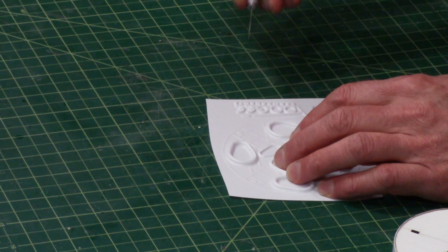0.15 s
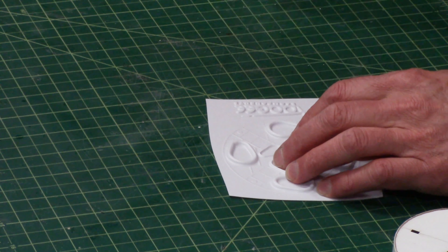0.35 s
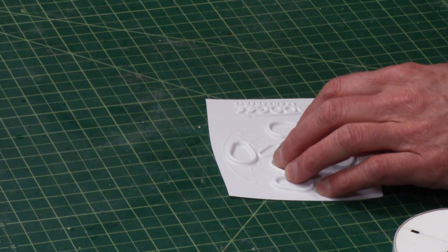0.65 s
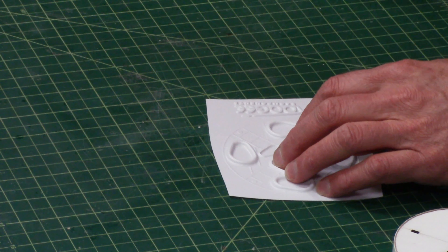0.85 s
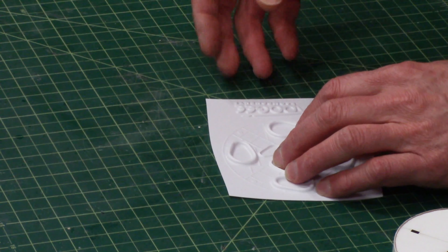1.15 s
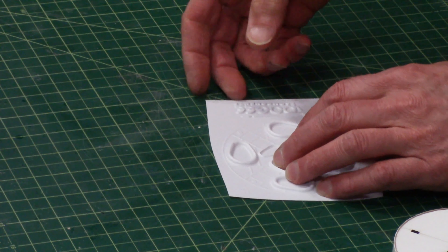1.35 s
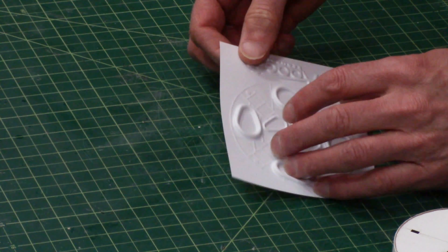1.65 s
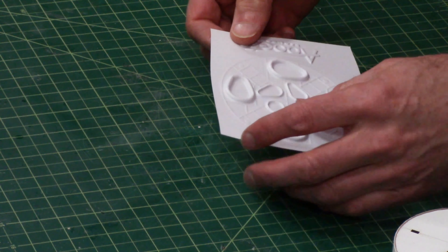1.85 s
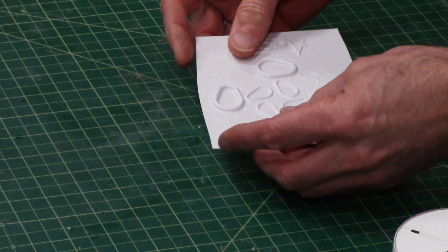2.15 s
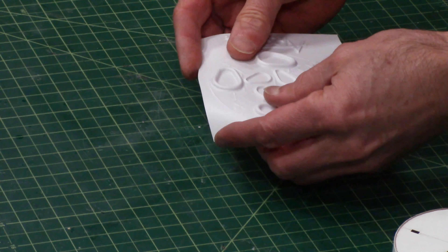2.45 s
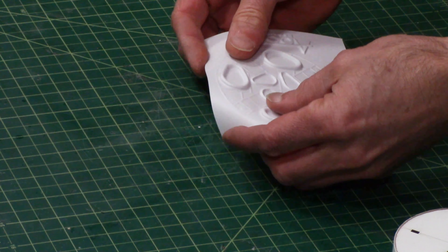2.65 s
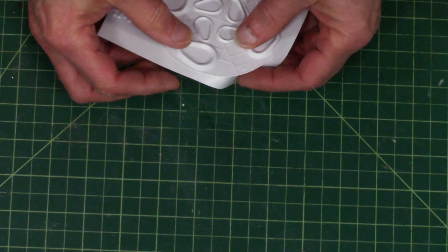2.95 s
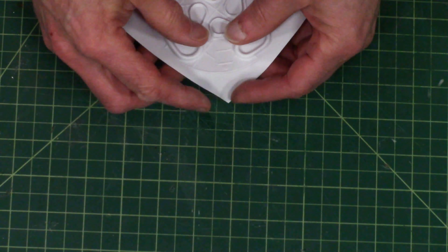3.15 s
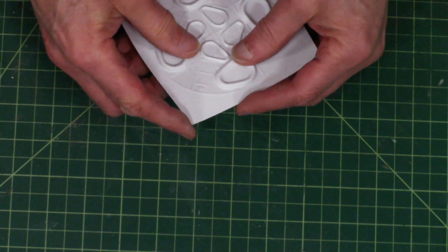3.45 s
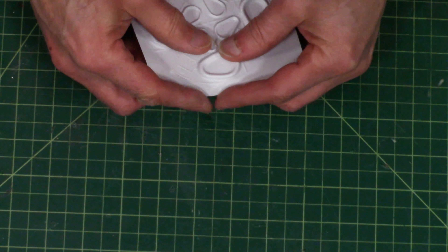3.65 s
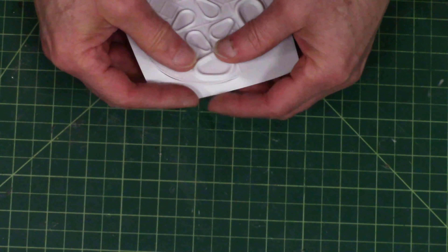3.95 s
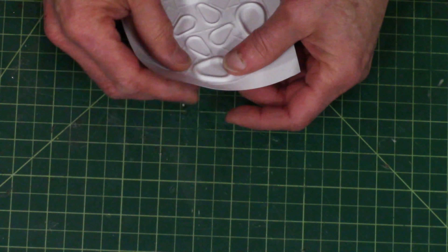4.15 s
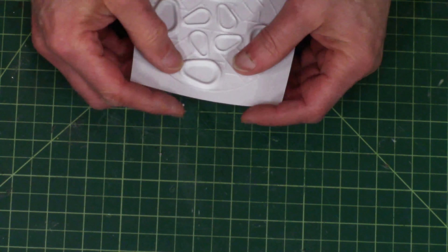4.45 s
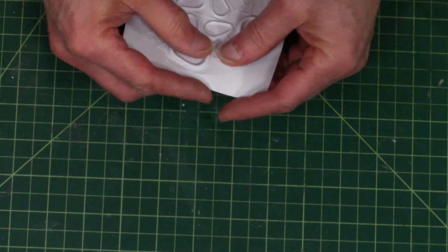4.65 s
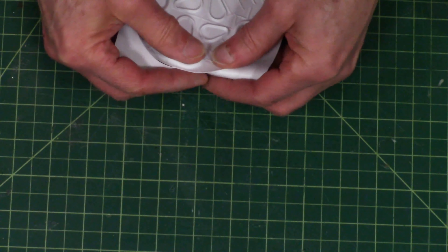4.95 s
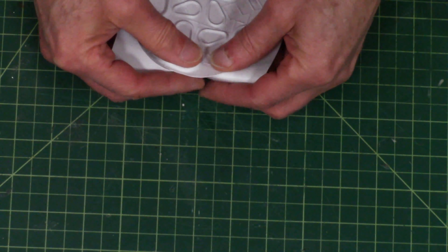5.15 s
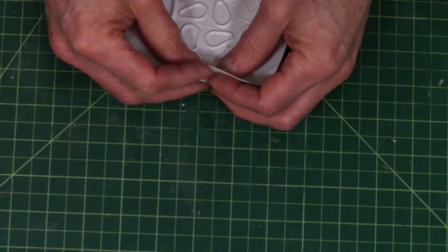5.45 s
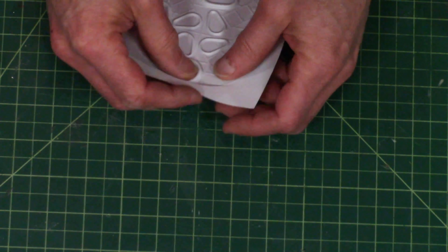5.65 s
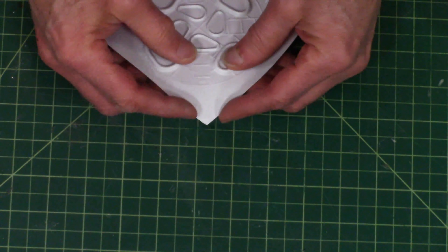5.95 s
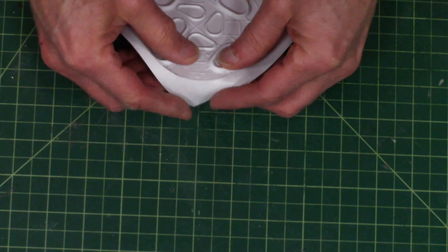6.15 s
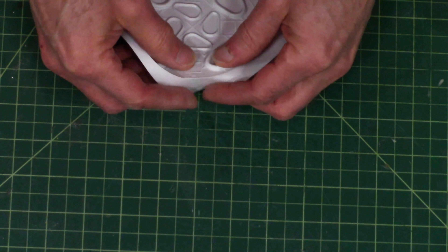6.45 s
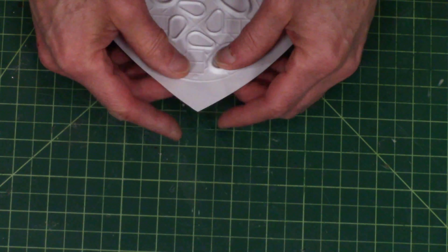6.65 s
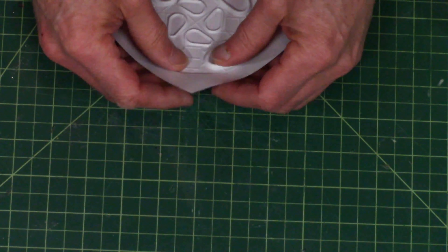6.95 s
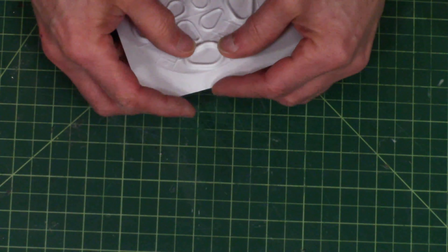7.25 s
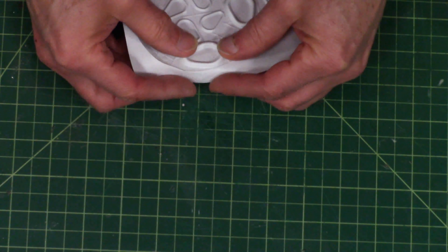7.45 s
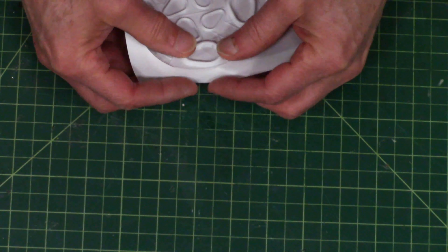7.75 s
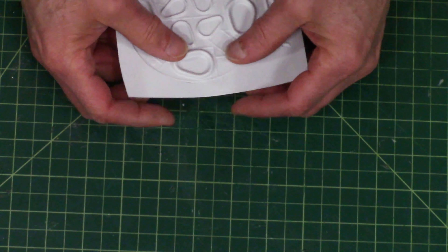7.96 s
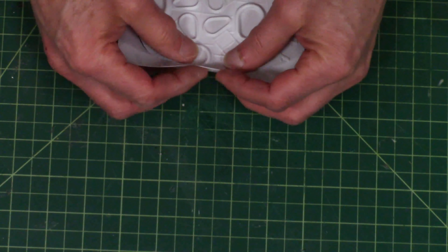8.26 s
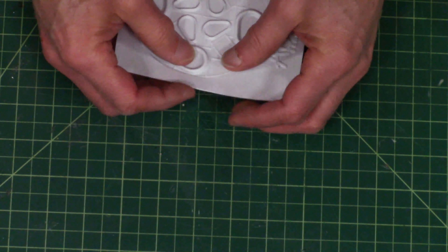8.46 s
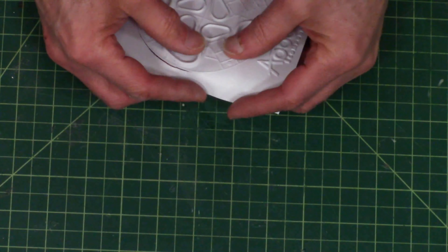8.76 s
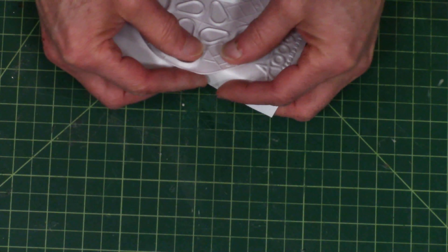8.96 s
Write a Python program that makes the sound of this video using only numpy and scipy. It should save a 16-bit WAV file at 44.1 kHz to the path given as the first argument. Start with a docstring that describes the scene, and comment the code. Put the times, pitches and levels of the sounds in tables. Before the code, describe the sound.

A craft knife is set down with a woody clack and a few fading taps on a matted bench. Hands pick up a thin plastic sheet with light scuffs, then bend it to and fro. Dry rustling strokes and tiny ticks run between crackles, with loud brittle snaps early on and again later. Close stereo microphones, small dry room, faint hiss and low rumble.

```python
"""Scored plastic sheet flexed by hand

A craft knife is laid on a cutting mat; two hands lift a thin scored plastic sheet and flex it to and fro.
The score crackles and snaps: each crack is a grainy burst of force that rings the plastic and the sheet.
Fingertips slide over the plastic as shaped noise and tiny ticks; knocks ring the modes of a bench.
A small, dry workshop answers with a few hard reflections, over a low rumble and faint hiss."""
import sys
import numpy as np
from scipy import signal
from scipy.fft import rfft, irfft
from scipy.io import wavfile
from scipy.ndimage import uniform_filter1d

SR = 44100
rng = np.random.default_rng(int(sys.argv[2]) if len(sys.argv) > 2 else 0)


def output_pcm(signal):
    """Save a mono or channel-first signal as 16-bit PCM at the path in sys.argv[1].

    Samples are clipped to [-1, 1] before scaling.
    """
    pcm = np.clip(np.atleast_2d(signal).T, -1, 1) * 32767
    wavfile.write(sys.argv[1], SR, np.round(pcm).astype(np.int16))


N = 401310
TAPS = 4096
HZ = np.fft.rfftfreq(TAPS, 1 / SR)


def amp(db):
    """Decibels to gain."""
    return 10 ** (np.asarray(db) / 20)


def evened(x):
    """Scales to rms 1."""
    return x / np.sqrt(np.mean(x ** 2) + 1e-20)


def read(points, hz):
    """Joins (Hz, value) points on a log-frequency axis."""
    f, value = np.transpose(points)
    return np.interp(np.log(hz + 1), np.log(f + 1), value)


def add(mix, start_s, sound):
    """Mixes a sound in at a time, cut at the end of the mix."""
    part = mix[:, round(start_s * SR):][:, :sound.shape[-1]]
    part += sound[..., :part.shape[1]]


def coloured(x, spectrum):
    """Gives a long signal a spectrum, at rms 1."""
    gain = amp(read(spectrum, np.fft.rfftfreq(N, 1 / SR)))
    return evened(irfft(rfft(x) * gain, N))


def causal(db):
    """Minimum-phase impulse response: the sharpest start this spectrum allows."""
    log_gain = np.log(amp(np.r_[db, db[-2:0:-1]]))
    return np.fft.ifft(np.exp(np.conj(signal.hilbert(log_gain)))).real


def ring(modes):
    """Impulse response of a few damped modes, alternating in sign."""
    t = np.arange(TAPS) / SR
    response = 0
    for k, (hz, width_hz, db) in enumerate(modes):
        decay = np.exp(-np.pi * width_hz * t)
        response = response + (-1) ** k * amp(db) * width_hz * decay * np.sin(2 * np.pi * hz * t)
    return response


def burst(ms, quick=1.61, grit_db=2.5):
    """Tiny fractures or slips that build up to a peak at ms / quick, then die; flattened in spectrum."""
    u = quick * np.arange(TAPS) / SR / (max(ms, .05) / 1000)
    grains = rng.standard_normal(TAPS) * amp(grit_db * np.minimum(rng.exponential(1, TAPS), 3))
    force = grains * u * np.exp(-u)
    power = uniform_filter1d(abs(rfft(force)) ** 2, size=30)
    flatten = causal(-10 * np.log10(power + power.mean() / 20))
    return signal.fftconvolve(force, flatten)[:TAPS]


def strike(force, body, db):
    """A force rings a body; db is its energy as an rms level over 20 ms."""
    sound = signal.fftconvolve(force, body)
    return amp(db) * np.sqrt(SR / 50) * sound / np.linalg.norm(sound)


def diffuse(size, apart_hz):
    """Noise from all around at two close microphones: alike in the bass, unrelated in the treble."""
    mid, side = rng.standard_normal((2, size))
    side = signal.lfilter(*signal.butter(1, apart_hz, "high", fs=SR), side)
    return np.array([mid + side, mid - side]) / np.sqrt(2)


# Rumble spectrum. Each row: frequency in Hz, relative density in dB per Hz.
RUMBLE_SPECTRUM = [(15, -5), (38, 0.5), (51, -9.5), (70, 0), (110, -4.5), (160, -12.5), (260, -19),
                   (450, -19), (800, -30.5), (2000, -34), (8000, -82)]
# Hiss spectrum. Each row: frequency in Hz, relative density in dB per Hz.
HISS_SPECTRUM = [(100, 8), (1000, -11), (1500, -2), (1780, -1), (1970, 7), (2250, -6.5), (3200, -5.5),
                 (6300, 0), (9000, -4), (12000, -7.5), (16000, -12.5)]


def background(rumble_db=-59.5, hiss_db=-65.0, growth_db=1.5):
    """Low rumble of the building, slowly growing, and microphone hiss."""
    growth = amp(rumble_db + growth_db * np.linspace(-.5, .5, N))
    rumble = coloured(diffuse(N, apart_hz=297.0), RUMBLE_SPECTRUM) * growth
    hiss = coloured(rng.standard_normal((2, N)), HISS_SPECTRUM) * amp(hiss_db)
    return rumble + hiss


# Reflections off the bench, wall and gear.
# Each row: delay left in ms, delay right in ms, left level in dB, right level in dB (re direct sound).
REFLECTIONS = [(.55, 0.37, -4.5, -4.5), (1.7, 1.9, -9, -9), (5.1, 4.7, -7, -6.5), (5.6, 5.7, 1.5, 1),
               (9.0, 6.4, -6, -14.5), (13.6, 11, -19.5, -14), (19.0, 8.3, -21, -25)]
# Decay of the workshop. Each row: frequency in Hz, t60 in seconds.
ROOM_T60 = [(150, 0.58), (500, 0.3), (1700, 0.23), (5500, 0.19), (9000, 0.15), (15000, 0.085)]
# Left minus right. Each row: frequency in Hz, level difference in dB.
LEFT_RIGHT_DB = [(400, -0.5), (1000, 0.5), (1400, -5), (2400, -3.5), (4200, -0.5), (6000, -6.5), (7500, 1),
                 (9500, 3.5), (15000, 7.5)]


def workshop(x, tail_db=0., build_s=0.0061, scatter_ms=0.15):
    """Direct sound, early reflections scattered by uneven surfaces, then a short diffuse tail."""
    size = SR // 2
    early = np.zeros((2, size))
    early[:, 0] = 1
    smooth = signal.butter(1, 1200, fs=SR)
    for left_ms, right_ms, left_db, right_db in REFLECTIONS:
        for side, (ms, db) in enumerate([(left_ms, left_db), (right_ms, right_db)]):
            # long waves bounce cleanly, short ones are scattered
            scatter = burst(scatter_ms)
            echo = scatter + signal.lfilter(*smooth, signal.unit_impulse(TAPS) - scatter)
            add(early[side:side + 1], ms / 1000, amp(db) * echo)
    hz, t, z = signal.stft(diffuse(size, 1900), SR, nperseg=256)
    decay = np.exp(-np.log(1000) * t / read(ROOM_T60, hz)[:, None])
    tail = signal.istft(z * decay, SR, nperseg=256)[1][:, :size]
    tail *= 1 - np.exp(-np.arange(size) / SR / build_s)
    response = early + amp(tail_db) * tail / np.linalg.norm(tail[0])
    response /= np.sqrt((response ** 2).sum() / 2)
    sides = np.array([causal(sign * read(LEFT_RIGHT_DB, HZ)) for sign in (.5, -.5)])
    response = signal.fftconvolve(response, sides, axes=1)
    return signal.fftconvolve(x, response, axes=1)[:, :N]


def moving(x, count=3, stay_s=.7):
    """The hands shift about: the sound takes turns through a few variants of the room response."""
    place = np.floor(np.arange(N) / SR / stay_s) % count
    return sum(workshop(x * uniform_filter1d(1. * (place == k), size=400)) for k in range(count))


# Knife and hands touching the bench.
# Each row: start in seconds, thud level in dB, clack level in dB, burst length in ms.
BENCH_KNOCKS = [(0.6143, -38, -33.5, 1.66), (.747, -44, -51, 1.25), (.761, -45.5, -56.5, 2.6),
                (.829, -51, -60, 1.17), (1.008, -51, -68, 2.2), (1.23, -51, -67, 1.4),
                (1.29, -51.5, -70, 81), (1.383, -45, -55, 2.5), (1.412, -49, -62, 15),
                (1.48, -63, -73, 5.3), (4.015, -53.5, -53, 6.9), (4.075, -58.5, -65, 16)]
# Modes of the bench top under the mat. Each row: frequency in Hz, width in Hz, relative level in dB.
BENCH_MODES = [(189.4, 68, -4.5), (262, 59, -1.5), (388, 36, 2), (460, 190, -8), (697, 320, -9.5),
               (970, 730, -19.5)]
# Clack spectrum. Each row: frequency in Hz, relative density in dB per Hz.
CLACK_SPECTRUM = [(150, -24), (500, -12), (850, -8.5), (1400, -9.5), (2000, -6.5), (2600, -10.5),
                  (3500, -17), (8000, -25), (16000, -48)]
# Tick spectrum. Each row: frequency in Hz, relative density in dB per Hz.
TICK_SPECTRUM = [(800, -18), (3000, -6), (3700, -6), (4400, 0), (6300, 1), (8500, 0), (10200, -2),
                 (11500, -12), (13500, -22), (16000, -36)]


def knocks(tick_re_clack_db=-5):
    """A blow thuds in the bench modes; the harder the contact, the more it clacks and ticks."""
    out, bench = np.zeros((2, N)), ring(BENCH_MODES)
    clack, tick = causal(read(CLACK_SPECTRUM, HZ)), causal(read(TICK_SPECTRUM, HZ))
    for start_s, thud_db, clack_db, ms in BENCH_KNOCKS:
        force = burst(ms)
        sound = strike(force, bench, thud_db)
        sound += strike(force, clack, clack_db)
        sound += strike(force, tick, clack_db + tick_re_clack_db)
        add(out, start_s, sound)
    return out


# Strokes of the fingertips over the sheet.
# Each row: middle in seconds, length in seconds, level in dB before layer trim, brightness in dB.
FINGER_STROKES = [(1.608, 0.082, -53.5, -1), (1.72, 0.099, -52, 1), (2.017, .24, -54.5, 4),
                  (2.21, 0.21, -55, 4), (2.386, 0.071, -56.5, 3), (2.488, 0.16, -59, -4),
                  (2.641, .22, -53.5, -9), (2.98, 0.17, -57.5, -1), (3.145, 0.062, -53, -2),
                  (3.276, 0.24, -52, 0), (3.469, 0.12, -50.5, 1.5), (3.72, 0.37, -54.5, -3),
                  (3.91, 0.16, -58.5, 3), (4.071, 0.22, -51, -1), (4.282, 0.068, -50.5, 1),
                  (4.417, 0.22, -59.5, 3), (4.577, 0.14, -53, 1), (4.68, 0.082, -55.5, 4.5),
                  (4.882, .12, -61.5, -7), (4.993, 0.13, -58.5, -8), (5.333, 0.23, -55, -2),
                  (5.635, 0.047, -56, 2), (5.727, 0.13, -55.5, 5), (5.915, 0.22, -56, 2),
                  (6.17, 0.081, -51, 1), (6.528, 0.13, -57.5, -1), (6.762, 0.31, -54.5, -1),
                  (7.1, 0.23, -55, 5.5), (7.285, 0.25, -56, 0), (7.69, 0.22, -55, -5),
                  (7.944, .15, -52, -2), (8.184, 0.095, -60, 1), (8.546, .13, -57, 2.5),
                  (8.742, 0.19, -54, 1.5), (8.938, 0.31, -48.5, -4)]


def sliding(lift_s=1.38, grip_db=-67.5, skew=0.9, curve=0.92):
    """Gain that follows fingertip speed: one arch per stroke, over the creep of the grip once lifted."""
    t = np.arange(N) / SR
    power = amp(grip_db) ** 2 * (t > lift_s)
    for middle_s, length_s, db, _ in FINGER_STROKES:
        progress = np.clip((t - middle_s) / length_s + .5, 0, 1)
        # skew under 1: the finger breaks loose faster than it comes to rest
        speed = abs(np.sin(np.pi * progress ** skew))
        power = power + (amp(db) * speed ** curve) ** 2
    return np.sqrt(power)


def brightness(hz, t, bright_hz=7800):
    """Treble gain in dB over frequency and time, gliding from one stroke's middle to the next."""
    middle_s, _, _, bright_db = np.transpose(FINGER_STROKES)
    treble = 1 / (1 + (bright_hz / (hz + 1)) ** 8)
    return np.outer(treble, np.interp(t, middle_s, bright_db))


# Spectrum of skin on plastic. Each row: frequency in Hz, relative density in dB per Hz.
SLIDE_SPECTRUM = [(100, -16), (450, -7.5), (800, -14.5), (1100, -14.5), (1400, -1), (1900, -2.5),
                  (2500, -9.5), (3400, -8), (4400, -3.5), (6300, 3), (8600, 1), (11000, -7.5),
                  (13000, -18.5), (16000, -26)]


def crackle(level_db=-2.5, ticks_per_s=300, spread_db=3.4):
    """Skin catches and slips on the embossed plastic in a stream of tiny ticks."""
    size = amp(spread_db * np.minimum(rng.exponential(1, N), 3))
    ticks = (rng.random(N) < ticks_per_s / SR) * rng.choice([-1, 1], N) * size
    return coloured(ticks, SLIDE_SPECTRUM) * sliding() * amp(level_db) * np.ones((2, 1))


def rustle(level_db=-1.0, patch_db=2.2, jerk_db=1.2):
    """Friction hiss, its colour wandering in patches as the sheet bends and the fingers move."""
    hz, t, z = signal.stft(diffuse(N, apart_hz=3500.), SR, nperseg=512)
    patches = uniform_filter1d(rng.standard_normal(z.shape[1:]), size=9, axis=0)
    patches = evened(uniform_filter1d(patches, size=14, axis=1))
    jerks = evened(uniform_filter1d(rng.standard_normal(len(t)), size=4))
    wander_db = patch_db * patches + jerk_db * jerks
    sides_db = np.array([[.5], [-.5]]) * read(LEFT_RIGHT_DB, hz)
    colour_db = (read(SLIDE_SPECTRUM, hz) + sides_db)[:, :, None] + wander_db + brightness(hz, t)
    hiss = signal.istft(z * amp(colour_db), SR, nperseg=512)[1][:, :N]
    return evened(hiss) * sliding() * amp(level_db)


def radiated(x, corner_hz):
    """Air slips round the edge of a small sheet, so it hardly radiates below its modes."""
    return signal.lfilter(*signal.butter(3, corner_hz, "high", fs=SR), x)


# Cracks and scuffs of the sheet. Each row: time in seconds, crack level in dB, flex ring level in dB,
# thump level in dB (all before trims), brightness in dB (re bright_ref_db), burst length in ms.
SHEET_CRACKS = [(1.384, -45, -57.5, -57, -14, 3.4), (1.477, -53.5, -61.5, -66, -7, 3.4),
                (1.495, -55, -62, -63, -5, 2.3), (1.787, -58, -66, -64.5, 0, 3.5),
                (1.942, -54, -70, -70, 2, 3.7), (2.803, -40, -36.5, -46, -19, 4.16),
                (2.823, -20, -30.5, -41, -5, 0.92), (2.931, -49.5, -51, -60, -6, 3.6),
                (3.055, -54, -63.5, -71, 0, 3), (3.264, -50, -58, -80, -1, 2.5),
                (3.313, -53.5, -61, -75, -5, 5.6), (3.7558, -32.5, -46.5, -65, -8, 2.6),
                (4.012, -50.5, -59, -58.5, -5, 3.1), (4.098, -45, -55.5, -79, -8, 6.8),
                (4.234, -48, -57, -63.5, -8, 4.2), (4.746, -60, -60, -76, -1, 2.3),
                (5.013, -59.5, -65, -85, -15, 1.4), (5.315, -46.5, -54, -66.5, -5.5, 2.66),
                (5.425, -42.5, -47, -58.5, -2, 4.7), (5.4689, -36, -41, -60.5, -3, 1.04),
                (5.488, -39.5, -48, -60, 30, 2.1), (5.4965, -36, -33.5, -67, -10, 1.8),
                (5.912, -48, -57, -75, -3.5, 11), (6.032, -56.5, -61, -77, -5, 4.6),
                (6.111, -53, -64, -80, -9, 1.55), (6.1973, -40.5, -44.5, -75, -11, 2.2),
                (6.2224, -33, -46, -64, -1, 0.92), (6.2955, -24, -40, -58.5, -11, 0.075),
                (6.501, -51.5, -57.5, -69, -2, 9.1), (6.6167, -41, -45, -54, -4.5, 2.1),
                (6.741, -44, -55.5, -65, -6, 1.66), (6.773, -51, -60, -61, 2, 3.3),
                (6.805, -46, -53.5, -64, 1, 1.1), (6.91, -55, -53, -62, -5, 1.6),
                (7.032, -49.5, -51, -66, -1, 4.5), (7.364, -41.5, -49, -67, 8.5, 3.4),
                (7.5533, -45, -56.5, -82, -10, 2.1), (7.588, -20.5, -33.5, -55.5, -5.5, 0.053),
                (8.034, -52.5, -57, -70, -3, 4.6), (8.259, -51, -54, -74, 2, 1),
                (8.2738, -31, -37, -58.5, -4.5, 1.94), (8.456, -52, -54, -61.5, -7, 15.7),
                (8.875, -45, -50, -61.5, -5, 6.5)]
# Bending modes damped by the hands, before random shifts.
# Each row: frequency in Hz, width in Hz, relative level in dB.
FLEX_MODES = [(1375, 120, -1), (1693, 123, -1.5), (2007, 340, -1), (2037, 1860, -7.5)]
# Thump modes of the sheet. Each row: frequency in Hz, width in Hz, relative level in dB.
THUMP_MODES = [(403, 170, 2), (515, 118, 4), (1040, 230, -6.5)]
# Crack spectrum without the local ring. Each row: frequency in Hz, relative density in dB per Hz.
CRACK_SPECTRUM = [(200, -39.5), (1000, -18), (2400, -16), (3300, -10.5), (3800, -9), (4400, -3), (5200, -5),
                  (6600, -4.5), (8600, 2), (10500, -5.5), (13000, -14), (16000, -37)]


def cracks(crack_trim_db=2.5, flex_trim_db=0., thump_trim_db=1.0, lead=.3,
           ring_hz=6290, ring_db=11.0, ring_width_hz=820.0, ring_rise_per_decade=0.022,
           ring_drop_hz_per_db=37, bright_ref_db=-4.5, bright_hz=7300.0):
    """Each crack rings the stiff plastic near the score, and the jolt sets the whole sheet flexing."""
    out = np.zeros((2, N))
    treble = 1 / (1 + (bright_hz / (HZ + 1)) ** 8)
    thump = radiated(ring(THUMP_MODES), corner_hz=307)
    for time_s, crack_db, flex_db, thump_db, bright_db, ms in SHEET_CRACKS:
        force = burst(ms)
        # lower for a clean, short snap than for a ragged one, and lower for a dull crack
        hz = ring_hz * (1 + ring_rise_per_decade * np.log10(ms))
        hz -= ring_drop_hz_per_db * max(bright_ref_db - bright_db, 0)
        local = ring_db / (1 + ((HZ - hz) / ring_width_hz) ** 2)
        colour = read(CRACK_SPECTRUM, HZ) + local + (bright_db - bright_ref_db) * treble
        # the grip and the bend shift the modes and their strengths from crack to crack
        modes = [(f * rng.normal(1, .025), width_hz, db + rng.normal(0, 2.5))
                 for f, width_hz, db in FLEX_MODES]
        flex = radiated(ring(modes), corner_hz=846.0)
        sound = strike(force, causal(colour), crack_db + crack_trim_db)
        sound += strike(force, flex, flex_db + flex_trim_db)
        sound += strike(force, thump, thump_db + thump_trim_db)
        # a longer slip starts earlier and builds up to its peak
        add(out, time_s - lead * ms / 1000, sound)
    return out


def scene():
    """Sheet, hands and knife in the workshop."""
    return moving(cracks() + knocks() + crackle()) + rustle() + background()


# Narrow dips in the response. Each row: centre in Hz, width of a single pass in Hz.
DIPS = [(2620, 226), (7750, 624)]


def record(dry, edge_hz=16300):
    """Two narrow, deep notches, each passed twice, then the band limit."""
    for hz, width_hz in DIPS:
        notch = signal.iirnotch(hz, hz / width_hz, SR)
        dry = signal.lfilter(*notch, signal.lfilter(*notch, dry))
    lowpass = signal.firwin(255, edge_hz, window=("kaiser", 9), fs=SR)
    return signal.oaconvolve(dry, lowpass[None], "same")


dry = scene()
out = record(dry)
output_pcm(out)
```